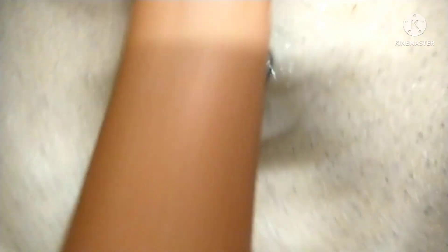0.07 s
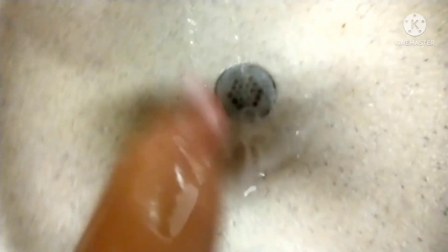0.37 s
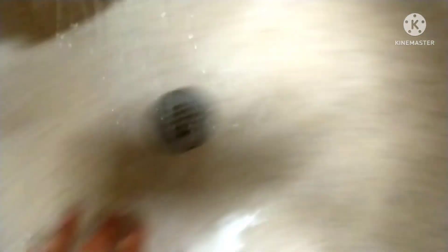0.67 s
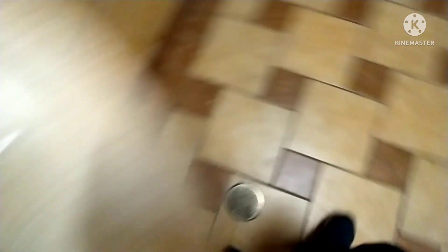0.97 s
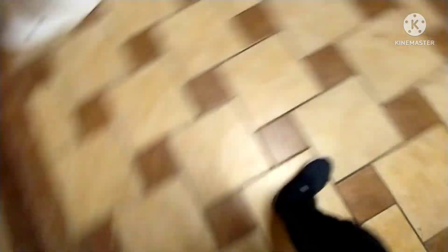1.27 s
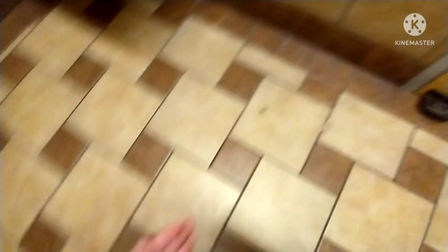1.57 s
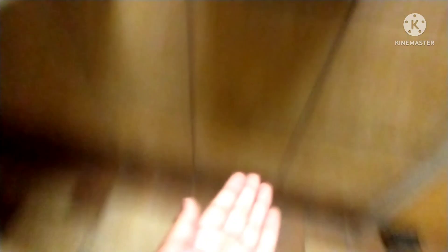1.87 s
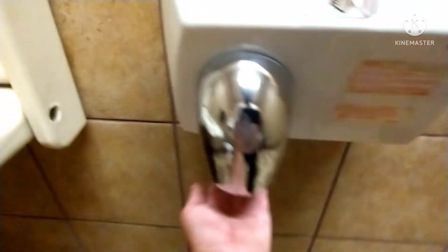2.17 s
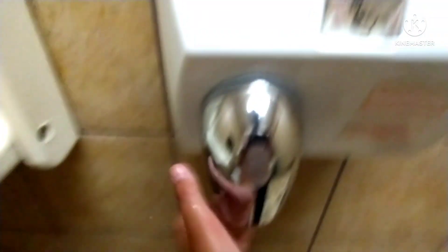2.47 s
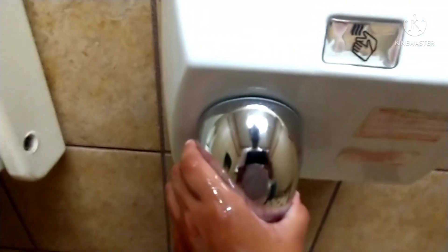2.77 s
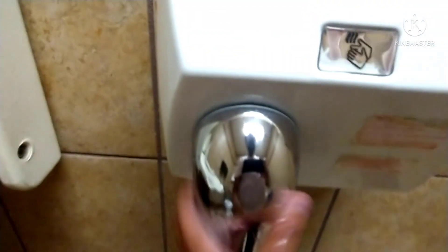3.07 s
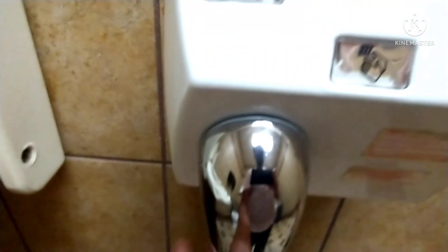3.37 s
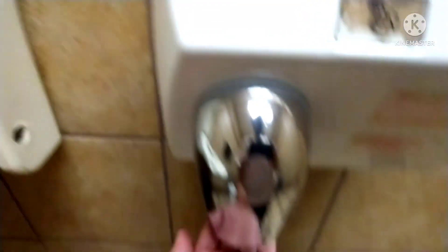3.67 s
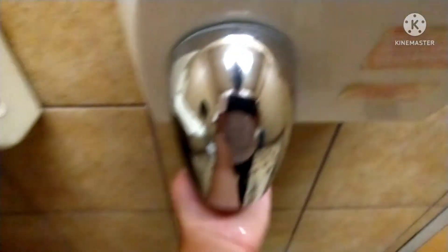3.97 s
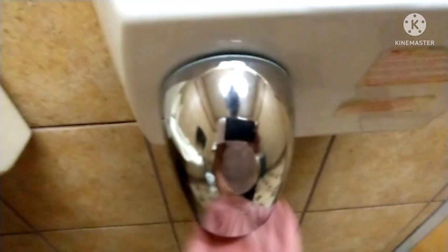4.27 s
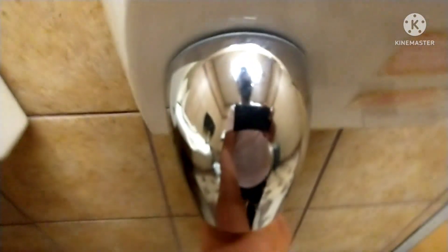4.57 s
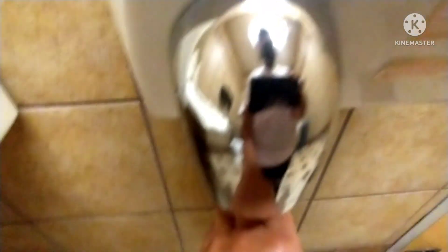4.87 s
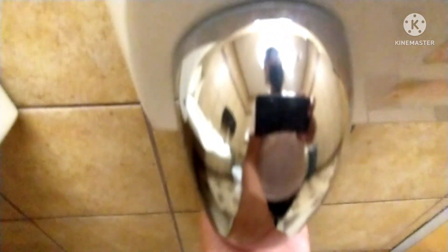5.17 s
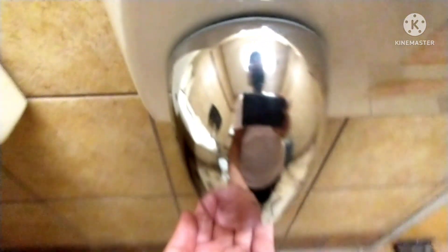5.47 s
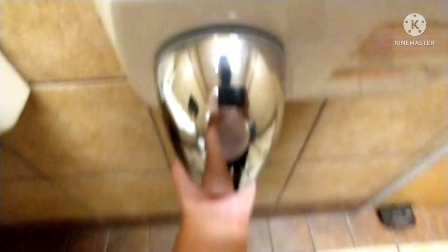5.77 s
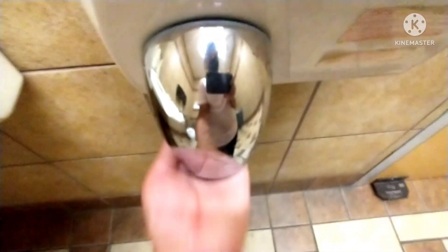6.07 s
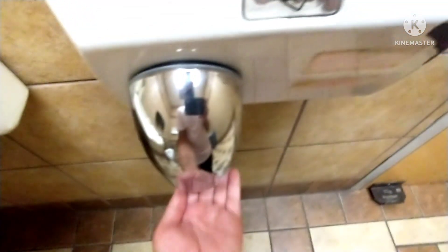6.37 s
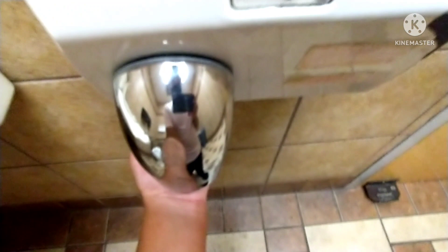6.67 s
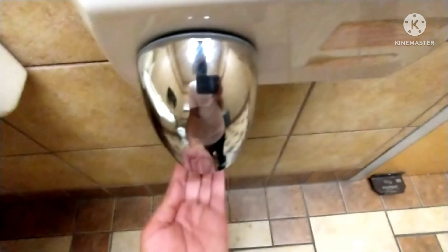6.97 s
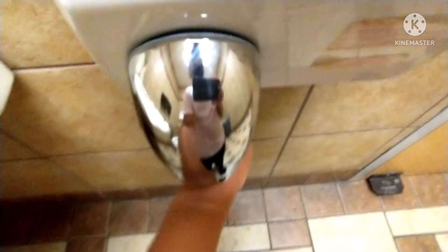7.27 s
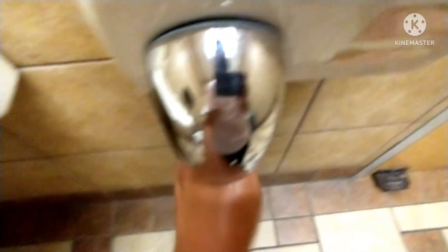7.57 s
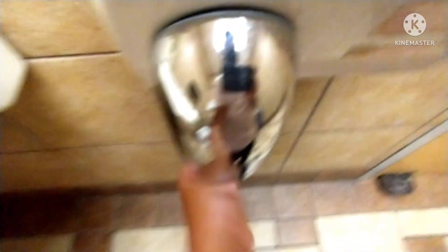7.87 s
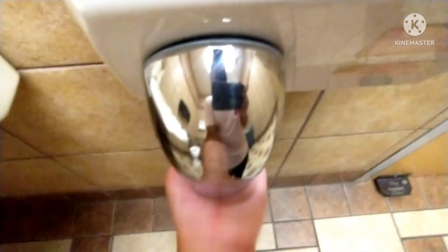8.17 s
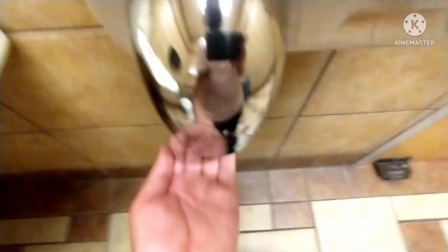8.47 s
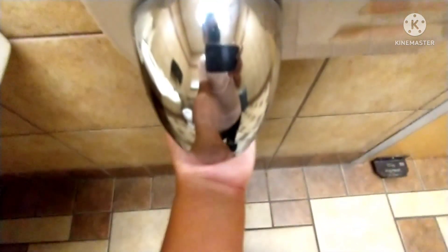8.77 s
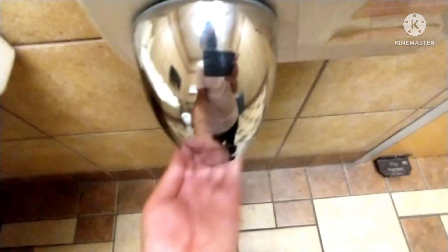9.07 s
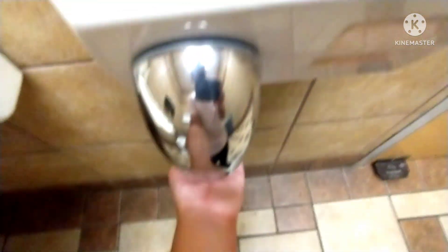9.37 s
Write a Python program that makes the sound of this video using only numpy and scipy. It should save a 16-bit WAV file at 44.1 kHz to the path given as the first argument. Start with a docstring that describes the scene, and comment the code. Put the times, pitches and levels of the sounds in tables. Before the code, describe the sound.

Wet hands shake drips into a basin, then a wall hand dryer clacks on and blasts air over a turning hand in a tiled restroom.

```python
"""A tiled restroom, ventilation running. Wet hands are shaken over a basin: drops tick, spray patters.
Someone shuffles to a wall dryer, clothes rustling, and it switches on with a clack. The motor spins up
and hums, the blower roars through its nozzle, and the jet hisses and buffets on a turning hand.
A phone with two unlike microphone ports is held close by."""
import sys
import numpy as np
from scipy import signal
from scipy.fft import rfft, irfft, next_fast_len
from scipy.io import wavfile
from scipy.ndimage import uniform_filter1d

SR = 44100
rng = np.random.default_rng(int(sys.argv[2]) if len(sys.argv) > 2 else 0)


def waveform_to_disk(signal):
    """Save audio, clipped to [-1, 1], as 16-bit WAV at the path in sys.argv[1]."""
    frames = np.transpose(np.atleast_2d(signal))
    scaled = np.clip(frames, -1, 1) * 32767
    samples = np.round(scaled).astype(np.int16)
    wavfile.write(sys.argv[1], SR, samples)


N = 420273
TIME_S = np.arange(N) / SR
FFT_SIZE = next_fast_len(N, True)
FREQ_HZ = np.maximum(np.arange(FFT_SIZE // 2 + 1) * SR / FFT_SIZE, 1)
SWITCH_S, FAN_LAG_S, FLOW_LAG_S = 2.411, .012, .03  # fan lags switch, air lags fan

# Port imbalance. Each row: frequency in Hz, left minus right in dB.
PORT_BALANCE = [(60, 2), (300, 1), (1050, -1), (1400, -3), (2700, -5.5), (4300, -5), (5300, 2.5),
                (6400, 0.4), (7400, -2), (8800, -2), (10000, -5), (11300, -11), (15000, -12)]
# Port coherence. Each row: frequency in Hz, likeness from 0 to 1.
PORT_COHERENCE = [(60, 0.63), (300, 0.89), (800, 0.54), (1100, 0.72), (1700, 0.4), (2400, 0.3),
                  (3200, 0.23), (4500, 0.18), (7000, 0.14), (9000, 0.061)]
# Treble reaches the left port first. Each row: frequency in Hz, lead in radians.
PORT_PHASE = [(950, 0), (2300, 0.65), (2850, 2.5), (3800, 3), (4650, 4.5), (7200, 4.5), (10000, 2.5)]

# Ventilation rush. Each row: frequency in Hz, relative level in dB.
VENT_COLOUR = [(20, -30), (45, -21), (90, -7.5), (180, -10), (250, -11), (480, -20.5), (750, -26.5),
               (1300, -34), (2500, -42), (7400, -52), (11000, -38), (15000, -48)]
# Ventilation hum. Each row: frequency in Hz, level in dB.
VENT_TONES = [(59.2, -61.5), (119, -69.5), (177.6, -71), (240, -77.5), (479, -79.5), (721, -85)]

# Cloth spectrum. Each row: frequency in Hz, relative level in dB.
CLOTH_COLOUR = [(300, -6), (900, -12), (1500, -8.5), (2850, -2), (4300, -4.5), (5650, -10), (6700, -5.5),
                (8800, -12), (11300, -7.5), (15000, -18)]
# Arm and leg swings. Each row: peak time in seconds, level in dB, rise and decay in seconds.
LIMB_SWINGS = [(.08, -58, 0.086, 0.083), (.43, -62, 0.057, 0.078), (1.44, -67.5, 0.14, .12),
               (1.6, -63.5, 0.086, .08), (1.78, -66, 0.029, .05), (1.887, -63, .005, .09),
               (2.01, -59, 0.052, 0.094)]
# A shoe lands and creaks. Each row: start in seconds, peak in dB, ring in Hz.
SHOE_TAPS = [(1.953, -55, 1100), (2.001, -42, 600), (2.069, -48, 950), (2.081, -50, 1150),
             (2.097, -49, 1150), (2.112, -48, 1050), (2.13, -47, 1100)]
# Fingers fling spray. Each row: peak time in seconds, relative level in dB, rise and decay in seconds.
FINGER_FLICKS = [(.46, -58, .025, .2), (.528, -42.5, 0.0088, 0.02), (.62, -62, .04, .1)]
# Loudest drops on the basin. Each row: start in seconds, relative peak in dB, ring in Hz.
BASIN_DROPS = [(0.0862, -44, 6700), (0.3361, -55, 6470), (0.4309, -50, 2920), (0.4604, -40, 11400),
               (0.4878, -45, 4510), (0.5202, -44, 4340), (0.5307, -34, 7400), (0.5414, -37, 7270),
               (0.5614, -43, 6580), (0.625, -30, 11300), (0.6384, -42, 11100), (0.6664, -40, 8240),
               (0.6749, -38, 6460), (0.7133, -47, 3990), (0.7851, -52, 2990), (0.8106, -49, 2860),
               (0.9198, -49, 10300), (0.9462, -59, 3480), (0.9607, -59, 9950), (1.0006, -56, 11100),
               (1.0281, -49, 8110), (1.039, -51, 11000), (1.0484, -51, 9680), (1.1223, -42, 10700)]

# Relay spectrum. Each row: frequency in Hz, relative level in dB.
CLACK_COLOUR = [(100, -4), (300, -3), (1300, -8), (2200, -1), (4200, 4), (5600, -5), (7600, 3), (9500, -8),
                (11800, -2), (15000, -11)]
# Housing modes under the clack. Each row: centre in Hz, width in Hz, boost in dB.
CLACK_MODES = [(2170, 180, 7), (4400, 300, 3)]
# Hum as the phone crosses standing waves. Each row: time in seconds, fundamental and octave in dB.
HUM_LEVELS = [(2.6, -46, -43), (2.72, -31, -45), (2.82, -41, -40), (3.02, -26.5, -44), (3.5, -28, -39),
              (3.95, -36, -37), (4.9, -33.5, -44), (5.18, -29, -39), (5.5, -31, -42), (5.65, -35.5, -37),
              (6.6, -35, -30.5), (7.3, -30.5, -35), (8.1, -36, -37), (8.5, -36, -32.5), (9.0, -35.5, -38),
              (9.5, -40.5, -46)]
# Other motor partials. Each row: multiple of the hum, relative level in dB.
HUM_ORDERS = [(.5, -23), (3.5, -8.5), (4, -8.5), (4.5, -8), (9, -8.5)]

# Airflow spectrum. Each row: frequency in Hz, relative level in dB.
FLOW_COLOUR = [(30, -35), (60, -15), (110, -6), (260, 0.5), (620, -6), (1050, -3.5), (1650, -7.5),
               (3000, -3), (4400, -5.5), (5200, -9), (7200, -7.5), (9500, -13), (11500, -11.5),
               (15500, -20)]
# Housing, nozzle and room modes. Each row: centre in Hz, width in Hz, boost in dB.
FLOW_MODES = [(240, 19, 3.5), (317, 21, 5), (394, 7.9, 3), (423, 5, 6), (487, 10, 7), (542, 21, 5),
              (724, 33, 5.5), (811, 14, 5.5), (850, 21, 6), (1003, 32, 5), (1095, 110, 6), (1200, 20, 4),
              (1490, 69, 5.5), (1760, 65, 4.5), (1863, 30, 3), (1935, 29, 4.5), (2210, 14, 5),
              (2534, 34, 5), (3080, 15, 4.5), (3140, 70, 2), (3215, 41, 2), (3390, 53, 3), (4130, 59, 5),
              (4440, 210, 2.5), (7460, 750, 1.5), (11200, 1000, 2.5)]
# Phone turns to the nozzle. Each row: time in seconds, left minus right in dB before centring.
PHONE_AIM = [(2.5, -9), (2.69, -8.0), (3.75, -5), (6.34, -4.0), (8.39, -6), (8.56, -3), (9.5, -6.5)]
# Phone moves over the nozzle. Each row: time in seconds, hollow-note boost and sizzle boost in dB.
PHONE_APPROACH = [(2.5, 1, -3.5), (2.95, -3.5, -5), (3.35, 1.5, -4.5), (4.0, -1.5, 1), (5.5, -0.5, 1.5),
                  (6.7, -0.5, 0.5), (7.5, 0.5, 2.5), (8.1, 2, 2), (9.0, 1.5, 2.5), (9.5, 6.5, -0.5)]
# Hand sweeps the jet and its hollow rings.
# Each row: centre and length in seconds, swish in dB, ring in Hz, ring level against the jet in dB.
HAND_STROKES = [(2.78, 0.36, 0, 2737, -3), (3.08, 0.3, 0, 2600, -7), (3.34, 0.21, 1.7, 3100, -4),
                (3.69, 0.17, 1.9, 3280, -4.5), (3.92, 0.16, 1, 2336, -4), (4.139, 0.17, 1.5, 2700, -19),
                (4.38, .16, 0.5, 4400, -7.5), (5.479, 0.12, .3, 1928, -3), (5.64, 0.28, 1.5, 2603, -12),
                (6.0, 0.11, 1.5, 2547, -12), (6.455, 0.24, 0.8, 2607, -2.5), (6.85, 0.27, 0.3, 2591, -4.5),
                (7.07, 0.091, 1.5, 2400, -6), (7.279, 0.21, -1, 2748, -8), (7.5, 0.15, 0, 2699, -5.5),
                (7.76, 0.3, -0.7, 2897, -4), (8.15, 0.2, -0.5, 3312, -7), (8.35, 0.16, 0, 2305, -8),
                (8.6, .22, 2.1, 2852, -8), (9.051, .2, -0.5, 2703, -12)]
# Hand slips out of the jet. Each row: centre and length in seconds, jet change in dB.
HAND_LULLS = [(4.605, 0.082, -4), (5.835, 0.098, -4), (6.2, 0.19, -0.6), (8.824, 0.11, -2)]
# Palm throws a gust at the phone. Each row: centre and length in seconds, band boost in dB.
PALM_GUSTS = [(3.425, 0.23, 4), (4.33, 0.14, 5.5), (4.905, 0.13, 4.5), (5.95, 0.32, 2.5), (6.22, .2, 3.5),
              (7.35, 0.09, 2.5), (8.334, 0.077, 2), (8.75, 0.089, 2.5), (9.082, .14, 3)]
# Hand shades (-) or reflects (+) the roar. Each row: centre and length in seconds, change in dB.
HAND_COVERS = [(3.63, 0.18, 1.4), (3.82, 0.15, -0.5), (4.08, .14, 1.2), (4.48, .14, -1.5),
               (6.303, 0.11, -1.4), (6.484, 0.17, -1.5), (6.7, 0.17, 1.5), (7.0, .1, 1.2),
               (7.11, 0.072, -1.2), (7.46, 0.12, 1.5)]


def undb(db):
    """Decibels to gain."""
    return np.exp(np.asarray(db) * (np.log(10) / 20))


def curves(table):
    """Each column of a timed table, per sample."""
    times_s, *columns = np.transpose(table)
    return [np.interp(TIME_S, times_s, column) for column in columns]


def colour(points):
    """Values per frequency, joined on a log axis."""
    hz, value = np.transpose(points)
    return np.interp(np.log(FREQ_HZ), np.log(hz), value)


def bell(hz, width_hz):
    """Power response of one resonance."""
    return 1 / (1 + (2 * (FREQ_HZ - hz) / width_hz) ** 2)


def modes_db(table):
    """Summed boost of several resonances."""
    return sum(db * bell(hz, width_hz) for hz, width_hz, db in table)


def band(lo_hz, hi_hz, order=8):
    """Band-pass gain."""
    return ((1 + (lo_hz / FREQ_HZ) ** order) * (1 + (FREQ_HZ / hi_hz) ** order)) ** -.5


def drift(rate_hz, size=N):
    """Random steps, smoothed twice; spread near 1."""
    hold = max(int(SR / rate_hz), 1)
    steps = np.repeat(rng.standard_normal(size // hold + 1), hold)
    return 1.3 * uniform_filter1d(uniform_filter1d(steps, hold), hold)[:size]


def swell(centre_s, length_s):
    """Raised cosine of peak 1, length_s wide at half height."""
    offset = (TIME_S - centre_s) / length_s
    return np.where(np.abs(offset) < 1, np.cos(np.pi / 2 * offset) ** 2, 0)


def moves_db(table):
    """Level change from hand movements."""
    return sum(db * swell(s, length_s) for s, length_s, db, *_ in table)


def bursts(table):
    """Gain of exponential rises and decays, summed in power."""
    power = 0
    for peak_s, db, rise_s, decay_s in table:
        fall = np.maximum((peak_s - TIME_S) / rise_s, (TIME_S - peak_s) / decay_s)
        power += (undb(db) * np.exp(-np.minimum(fall, 20))) ** 2
    return np.sqrt(power)


def pan(db):
    """Left and right gains for a level difference."""
    return undb(np.array([db, -db]).reshape(2, -1) / 2)


def ports():
    """Responses of the two ports to a common and to an opposed sound."""
    alike, lead_rad = colour(PORT_COHERENCE), colour(PORT_PHASE)
    left, right = pan(colour(PORT_BALANCE))
    scale = np.sqrt(left ** 2 + right ** 2 + 2 * alike * np.cos(lead_rad))
    left = left * np.exp(1j * lead_rad)
    common = np.array([left, right]) * np.sqrt(1 + alike)
    opposed = np.array([left, -right]) * np.sqrt(1 - alike)
    return common / scale, opposed / scale


def noise(gain, grain_db=0):
    """Coloured noise at both ports, mono rms 1; grain makes it crackle."""
    white = rng.standard_normal((2, FFT_SIZE))
    if grain_db:
        grains = np.repeat(rng.exponential(size=FFT_SIZE // 16 + 1), 16)[:FFT_SIZE]
        white *= undb(grain_db * np.minimum(grains, 5))
    common, opposed = rfft(white) * gain
    common_gain, opposed_gain = ports()
    x = irfft(common * common_gain + opposed * opposed_gain, FFT_SIZE)[:, :N]
    return x / np.std(x.mean(0))


def boost(x, hz, width_hz, db):
    """Raise or lower one band by a moving amount."""
    b, a = signal.iirpeak(hz, hz / width_hz, fs=SR)
    return x + (undb(db) - 1) * signal.lfilter(b, a, x)


def add(out, start_s, sound):
    """Mix in a short sound."""
    i = int(start_s * SR)
    out[:, i:i + sound.shape[-1]] += sound


def tap(hz, ring_s, crack, crack_s=.0017):
    """Tiny impact of peak 1: a damped ring and a noise crack centred on it."""
    t = TIME_S[:SR // 20]
    b, a = signal.iirpeak(min(hz, .4 * SR), 1.5, fs=SR)
    burst = signal.lfilter(b, a, rng.standard_normal(len(t)) * np.exp(-t / crack_s))
    ring = np.sin(2 * np.pi * hz * t) * np.exp(-t / ring_s)
    x = ring + crack * burst / np.abs(burst).max()
    return x / np.abs(x).max()


def tiles(x, wet_db, t60_s=.45):
    """Add the bright tail of the tiled room."""
    t = TIME_S[:SR]
    tail = rng.standard_normal((2, SR)) * np.exp(-np.log(1000) * t / t60_s) * (1 - np.exp(-t / .006))
    tail /= np.sqrt((tail ** 2).sum(1, keepdims=True))
    return x + undb(wet_db) * signal.fftconvolve(x, tail, axes=1)[:, :N]


def ventilation(rush_db=-63.5):
    """Low rush of air with a fan's hum."""
    rush = noise(undb(colour(VENT_COLOUR))) * undb(rush_db + .8 * drift(5.8))
    hum = sum(undb(db + 1.2 * drift(2)) * np.sin(2 * np.pi * hz * TIME_S) for hz, db in VENT_TONES)
    return rush + np.sqrt(2) * hum


def shuffle(rest_db=-75.5, step_off_s=1.3):
    """Cloth rustles with each swing; stepping away adds low scuffing and a shoe's creak."""
    cloth = noise(undb(colour(CLOTH_COLOUR)), grain_db=2) * pan(-1.2)
    stepping = np.clip((TIME_S - step_off_s) / .1, 0, 1)
    scuff = undb(-7 + 2 * drift(20)) * noise(band(250, 900, order=3)) * stepping
    out = (cloth + scuff) * np.hypot(bursts(LIMB_SWINGS), undb(rest_db))
    for start_s, db, hz in SHOE_TAPS:
        add(out, start_s, undb(db) * tap(hz, ring_s=.0009, crack=.9))
    return tiles(out, wet_db=-6)


def patter(from_s, count=20, length_s=.45, top_db=-51, range_db=9, hz=9500):
    """Small random drops, ever sparser; rows as in BASIN_DROPS."""
    when, size, pitch = rng.random((count, 3)).T
    return list(zip(from_s + length_s * when ** 2, top_db - range_db * size, hz * 2 ** (pitch - .5)))


def water(drain_s=.81, drain_db=-70):
    """Drops tick on the basin amid clumps of spray; the bowl rings, and briefly the drain."""
    bowl = undb(7.3 * bell(4300, 450) + 5 * bell(7600, 2200) + 9.3 * bell(11300, 1000))
    spray = noise(band(2500, 12500) * bowl, grain_db=1.2)
    out = spray * bursts(FINGER_FLICKS) * undb(-2 + 2.7 * drift(300)) * pan(-1.8)
    loudest_s = max(BASIN_DROPS, key=lambda drop: drop[1])[0]
    for start_s, db, hz in BASIN_DROPS + patter(loudest_s):
        tick = tap(hz, ring_s=11 / hz, crack=.81)  # bigger drops ring lower and longer
        add(out, start_s, undb(db + 1) * pan(-8) * tick)
    out = signal.sosfilt(signal.butter(4, 1900, "high", fs=SR, output="sos"), out)
    drain = noise(bell(2960, 320)) * undb(drain_db) * np.exp(-((TIME_S - drain_s) / .06) ** 2)
    return tiles(out + drain, wet_db=-10)


def switch(clack_db=-45, clack_s=.01, tail_db=-44, tail_s=.15, growl_db=-48, growl_s=.07):
    """The relay clacks in the housing, the room answers, the motor growls as it takes hold."""
    t = np.maximum(TIME_S - SWITCH_S, 0)
    attack = 1 - np.exp(-t / .0017)
    decay = undb(clack_db) * np.exp(-t / clack_s) + undb(tail_db) * np.exp(-t / tail_s)
    growl = noise(band(70, 360)) * undb(growl_db) * t / growl_s * np.exp(1 - t / growl_s)
    clack = noise(undb(colour(CLACK_COLOUR) + modes_db(CLACK_MODES)))
    return clack * attack * decay * pan(-4) + growl


def fan_speed(lag_s, spin_up_s=.16, creep_s=.7, creep_share=.06):
    """Share of full speed: a quick climb, then a slow creep."""
    t = np.maximum(TIME_S - SWITCH_S - lag_s, 0)
    shortfall = (1 - creep_share) * np.exp(-t / spin_up_s) + creep_share * np.exp(-t / creep_s)
    return np.maximum(1 - shortfall, 0)


def motor(hum_hz=120.3, wobble=.0031, waver_db=1.1, orders_db=-36.5):
    """The hum climbs to speed and wavers in the draught."""
    speed = fan_speed(FAN_LAG_S)
    phase = 2 * np.pi * np.cumsum(hum_hz * speed * (1 + wobble * drift(12))) / SR
    fundamental_db, octave_db = curves(HUM_LEVELS)
    partials = [(1, undb(fundamental_db) * speed), (2, undb(octave_db) * speed)]
    partials += [(order, undb(orders_db + db) * speed ** 4) for order, db in HUM_ORDERS]
    hum = sum(gain * undb(waver_db * drift(7)) * np.sin(order * phase) for order, gain in partials)
    return np.sqrt(2) * hum * pan(.72)


def rub_whistle(level_db=-38.5, rise_s=.2):
    """Something rubs thinly during the run-up."""
    age = np.maximum(TIME_S - SWITCH_S, 0) / rise_s
    return noise(bell(7560, 520)) * undb(level_db) * age * np.exp(1 - age)


def buffeting(spectrum):
    """Low turbulence; gusts off the palm lift a throaty band."""
    rumble = noise(spectrum * band(15, 587))
    return boost(rumble, hz=290, width_hz=250, db=moves_db(PALM_GUSTS)) * undb(1.04 * drift(22))


def blower_roar(spectrum, hollow_db):
    """Midrange roar with the nozzle's hollow note."""
    roar = noise(spectrum * band(560, 1780))
    return boost(roar, hz=1014, width_hz=110, db=hollow_db) * undb(.38 * drift(8))


def cupped_hand(width_hz=680):
    """Air rings in the hand's hollow: a noise band slides to a new pitch on each stroke."""
    centre_hz, = curves([(s, hz) for s, _, _, hz, _ in HAND_STROKES])
    gain = sum(undb(db) * swell(s, length_s) for s, length_s, _, _, db in HAND_STROKES)
    mean_hz = centre_hz.mean()
    ring = signal.hilbert(noise(bell(mean_hz, width_hz)), FFT_SIZE)[:, :N]
    slide = np.exp(2j * np.pi * np.cumsum(centre_hz - mean_hz) / SR)
    return gain * (ring * slide).real


def hand_echo(x, share=.19, lag_s=.0009, sway=.302):
    """Add the echo off a moving hand; its changing path sweeps a comb."""
    delayed_s = TIME_S - lag_s * np.exp(sway * drift(3))
    echo = np.array([np.interp(delayed_s, TIME_S, port) for port in x])
    return (x + share * echo) / np.sqrt(1 + share ** 2)


def jet_rush(spectrum):
    """The jet strikes the hand, rings in it and glances off."""
    rush = noise(spectrum * band(1800, 4930, order=14) * undb(-bell(2600, 440)))
    return hand_echo(rush + cupped_hand()) * undb(.5 * drift(25))


def jet_hiss(spectrum, sizzle_db):
    """The jet's treble, topped by a fine sizzle."""
    hiss = noise(spectrum * band(4920, 22000, order=14))
    return boost(hiss, hz=11900, width_hz=3200, db=sizzle_db) * undb(.73 * drift(25))


def airflow(draw_back_s=9.12, fade_db_per_s=-12, calm_db=-3, calm_s=.07):
    """Turbulence grows with fan speed; the hand shifts its balance, then hand and phone draw back."""
    # standing waves between the tiles comb the upper midrange
    ripple_db = 1.44 * drift(200, size=len(FREQ_HZ)) * band(1200, 5000, order=2)
    spectrum = undb(colour(FLOW_COLOUR) + ripple_db + modes_db(FLOW_MODES))
    speed = fan_speed(FAN_LAG_S + FLOW_LAG_S)
    swish_db, lull_db = moves_db(HAND_STROKES), moves_db(HAND_LULLS)
    hollow_db, sizzle_db = curves(PHONE_APPROACH)
    away_s = np.maximum(TIME_S - draw_back_s, 0)
    fade_db = fade_db_per_s * away_s

    buffet = buffeting(spectrum) * speed ** 3.8 * undb(-24 + calm_db * np.minimum(away_s / calm_s, 1))
    roar = blower_roar(spectrum, hollow_db) * speed ** 2.06 * undb(-21.5 + .51 * fade_db)
    jet = jet_rush(spectrum) * speed ** 2.86 * undb(-22 + .8 * swish_db + lull_db + fade_db)
    hiss = jet_hiss(spectrum, sizzle_db) * speed ** 3 * undb(-22.5 + swish_db + .5 * lull_db + fade_db)

    aim_db, = curves(PHONE_AIM)
    facing = pan(aim_db - np.median(aim_db[N // 2:]))
    return (buffet + roar) * undb(moves_db(HAND_COVERS)) + (jet + hiss) * facing


def scene():
    """Water and steps, then the dryer, over the ventilation."""
    return ventilation() + water() + shuffle() + switch() + motor() + rub_whistle() + airflow()


def record(dry):
    """The phone rounds the highest peaks and cuts the top."""
    ceiling, top_hz = .9, 15600
    limited = dry / (1 + (dry / ceiling) ** 8) ** (1 / 8)
    return signal.sosfilt(signal.ellip(10, .2, 80, top_hz, fs=SR, output="sos"), limited)


dry = scene()
out = record(dry)
waveform_to_disk(out)
```